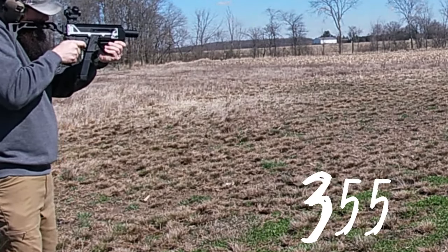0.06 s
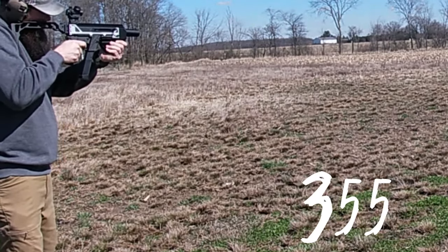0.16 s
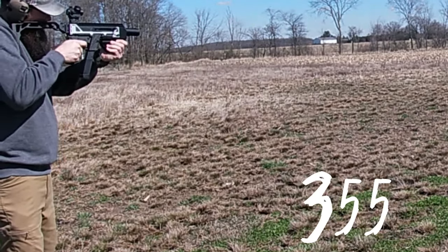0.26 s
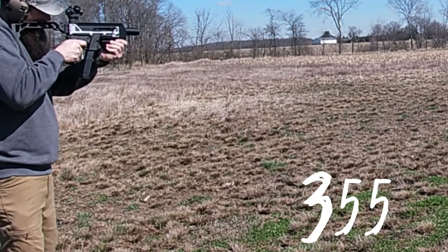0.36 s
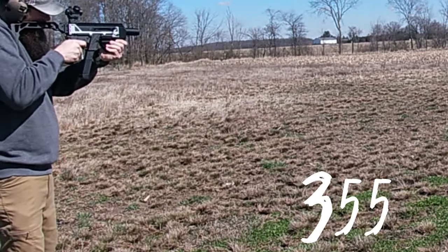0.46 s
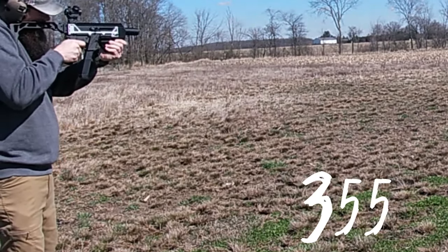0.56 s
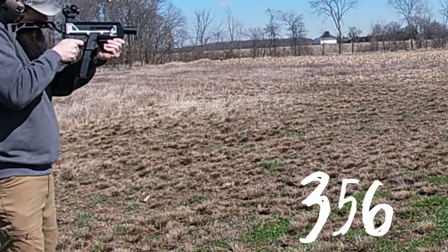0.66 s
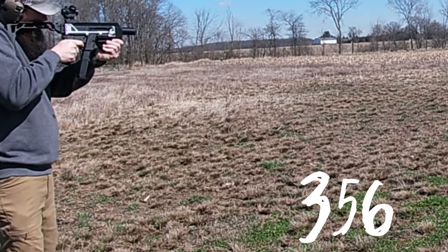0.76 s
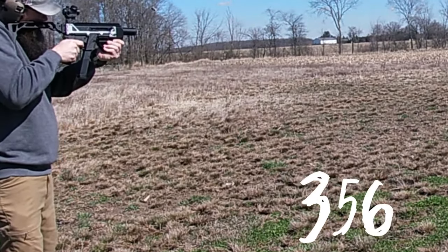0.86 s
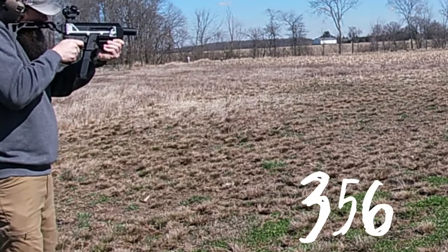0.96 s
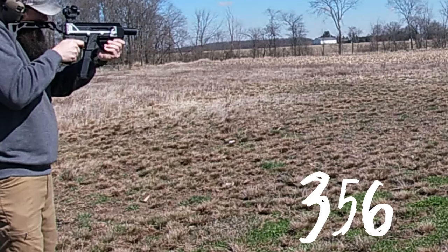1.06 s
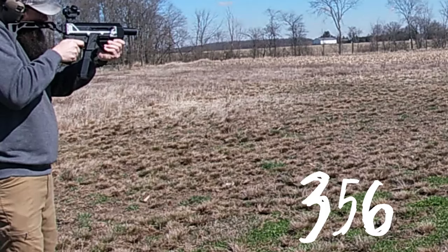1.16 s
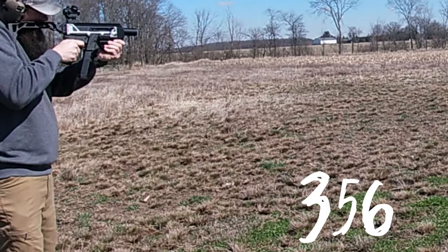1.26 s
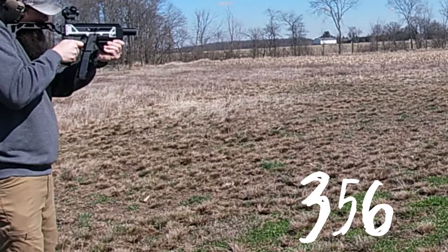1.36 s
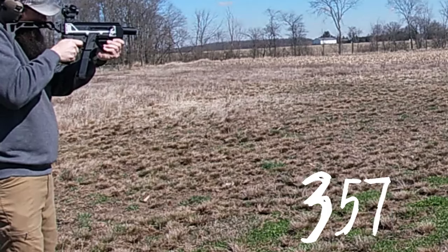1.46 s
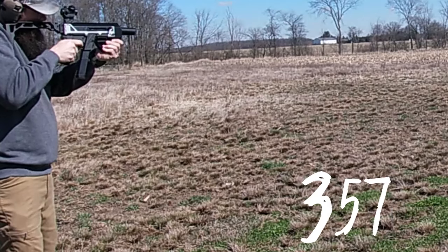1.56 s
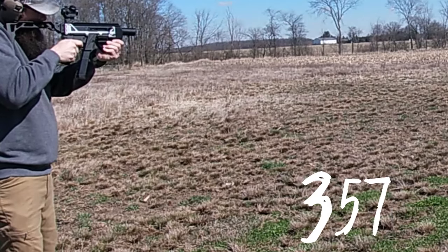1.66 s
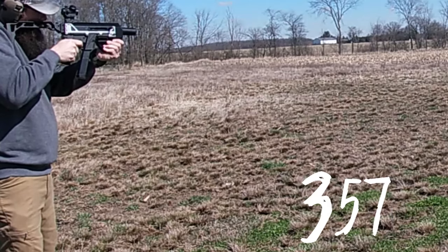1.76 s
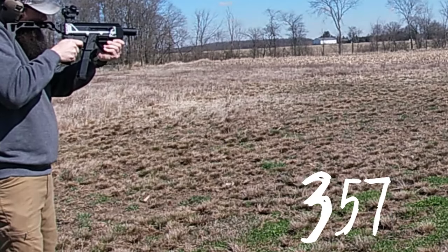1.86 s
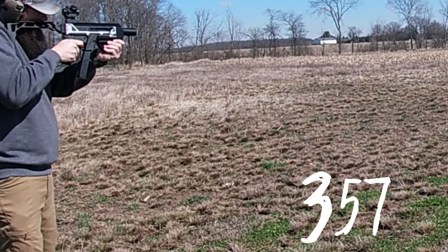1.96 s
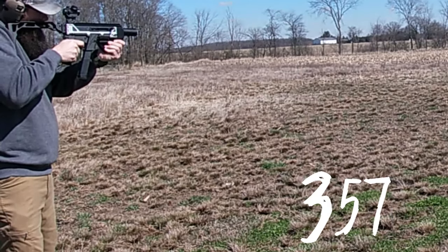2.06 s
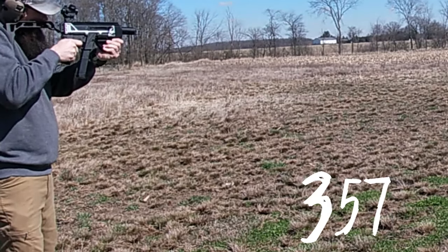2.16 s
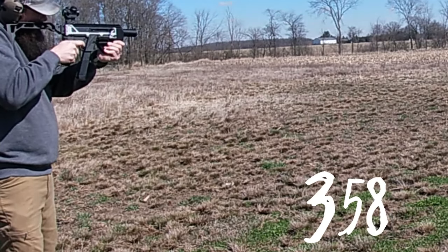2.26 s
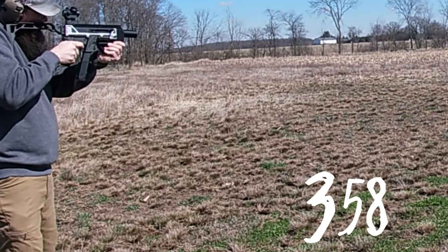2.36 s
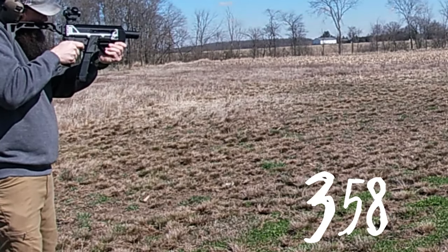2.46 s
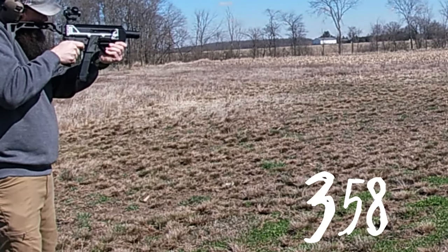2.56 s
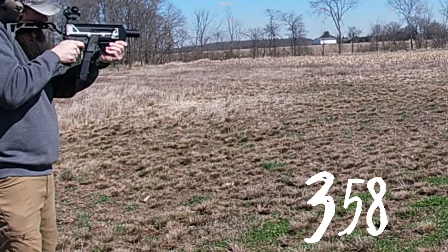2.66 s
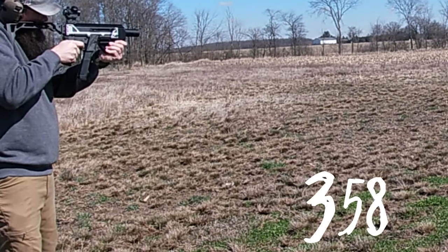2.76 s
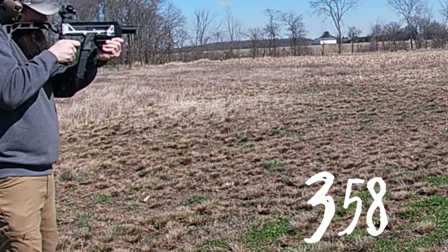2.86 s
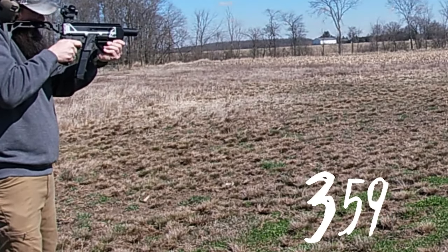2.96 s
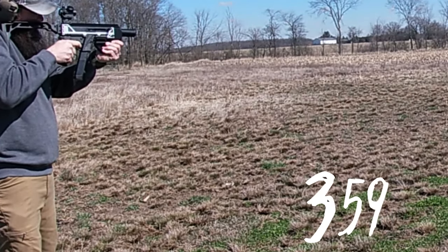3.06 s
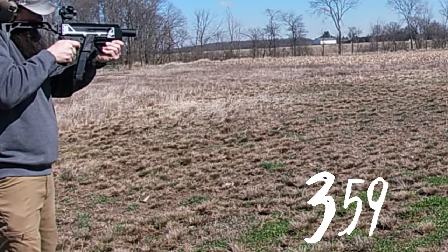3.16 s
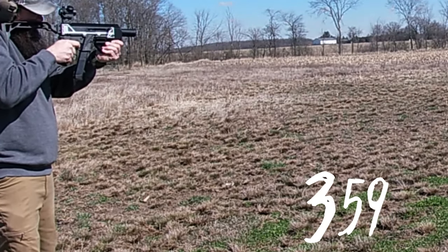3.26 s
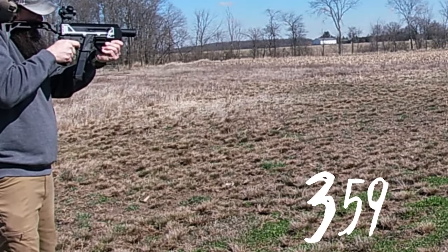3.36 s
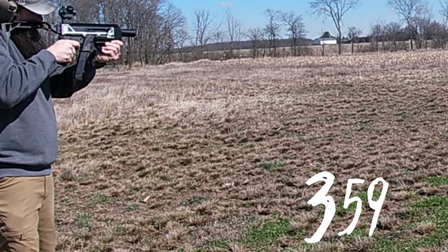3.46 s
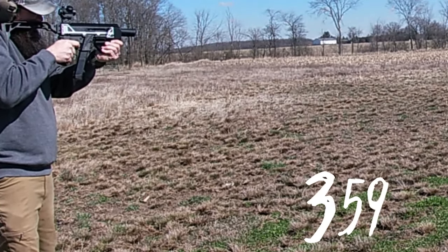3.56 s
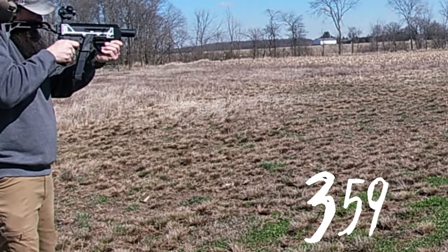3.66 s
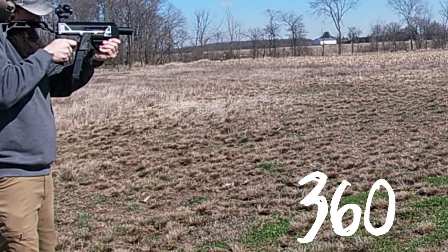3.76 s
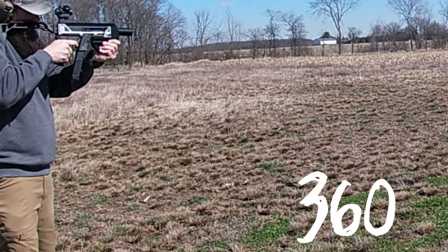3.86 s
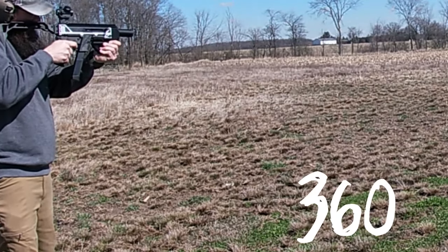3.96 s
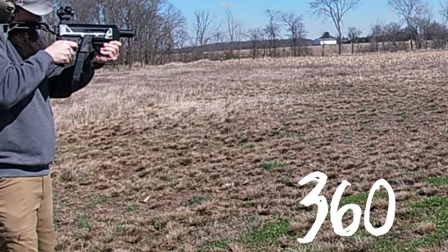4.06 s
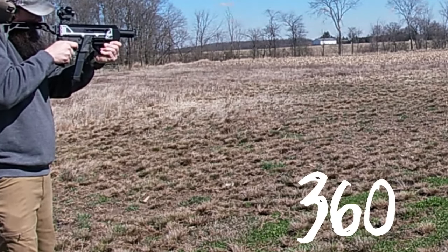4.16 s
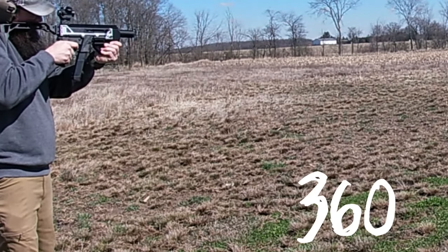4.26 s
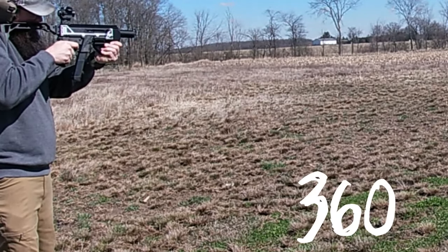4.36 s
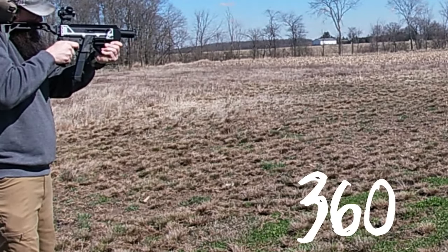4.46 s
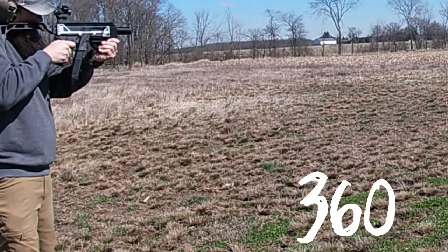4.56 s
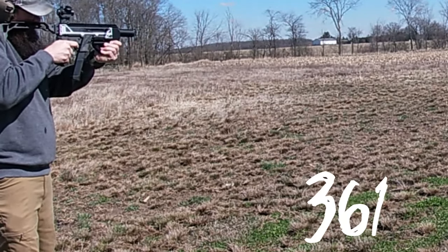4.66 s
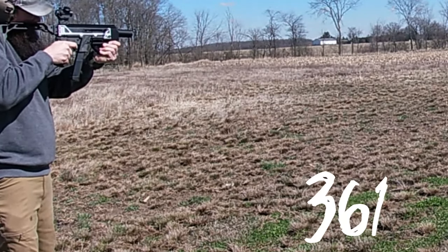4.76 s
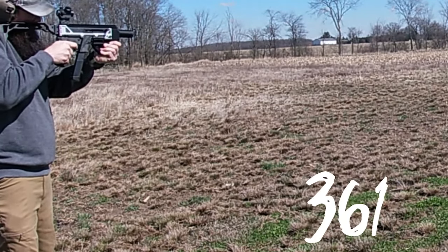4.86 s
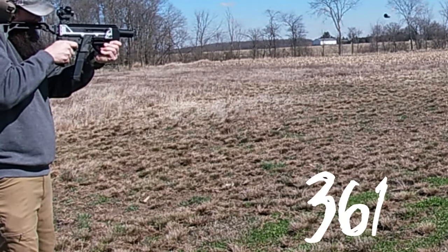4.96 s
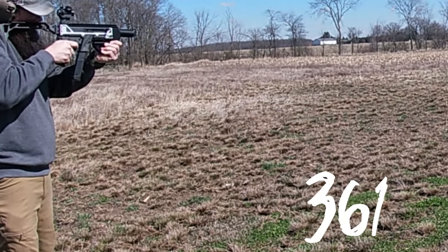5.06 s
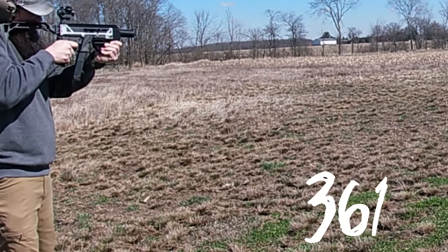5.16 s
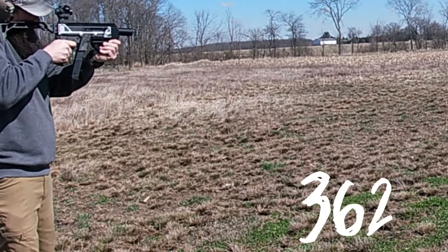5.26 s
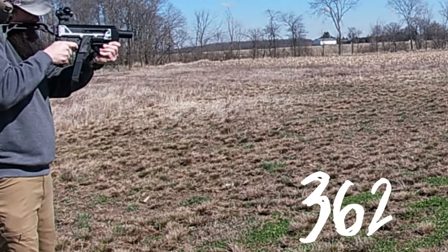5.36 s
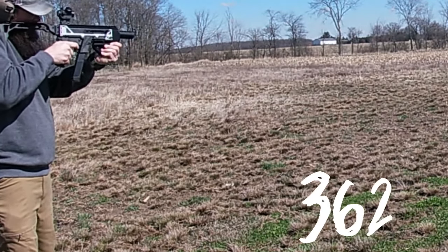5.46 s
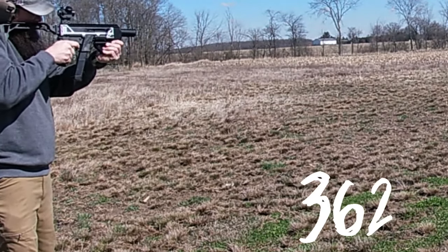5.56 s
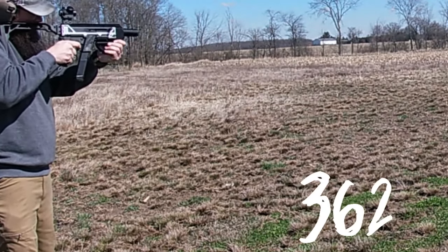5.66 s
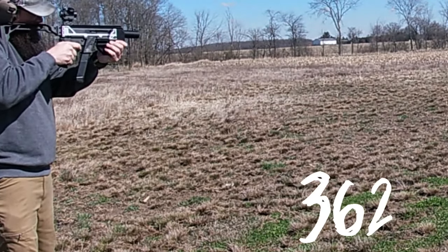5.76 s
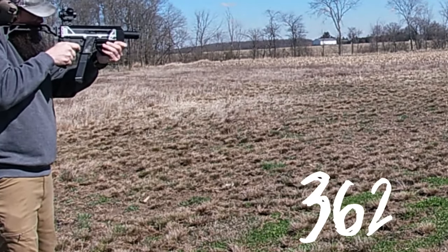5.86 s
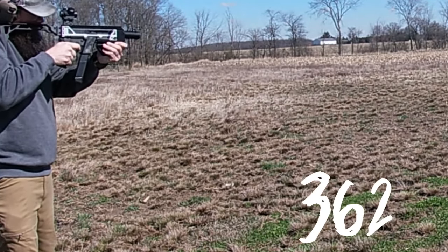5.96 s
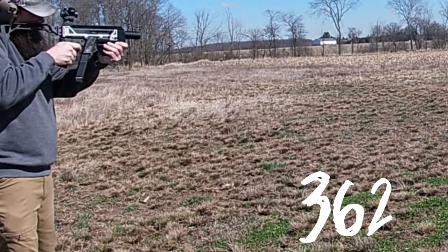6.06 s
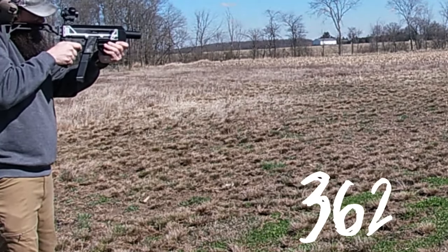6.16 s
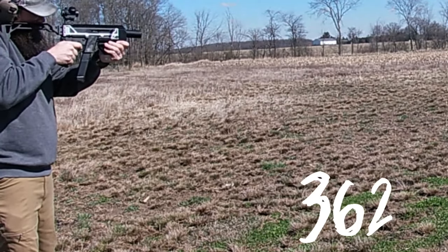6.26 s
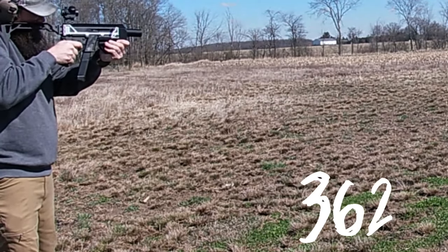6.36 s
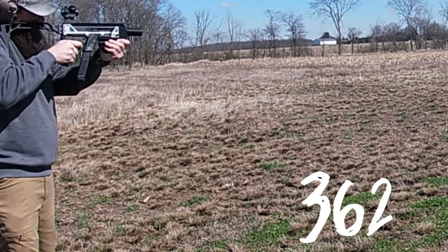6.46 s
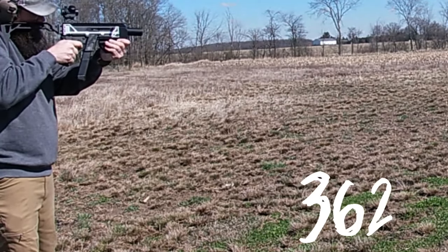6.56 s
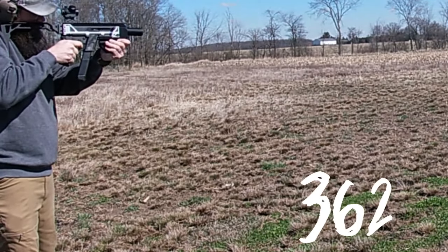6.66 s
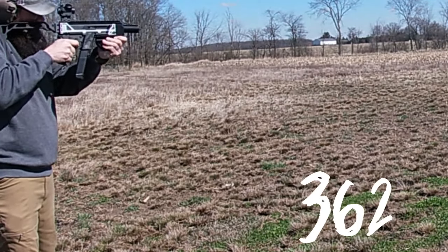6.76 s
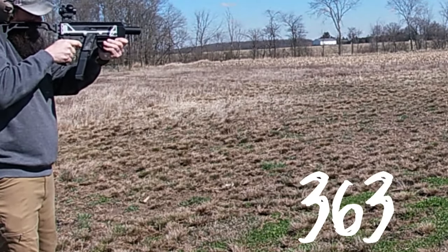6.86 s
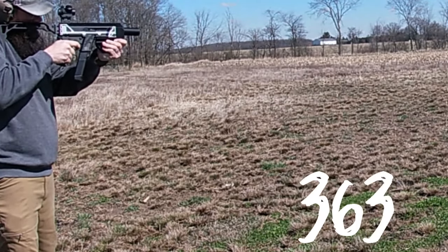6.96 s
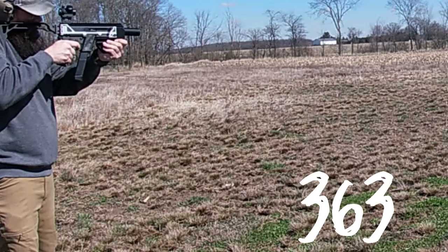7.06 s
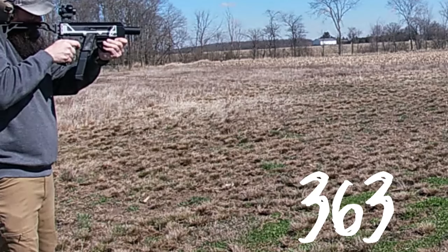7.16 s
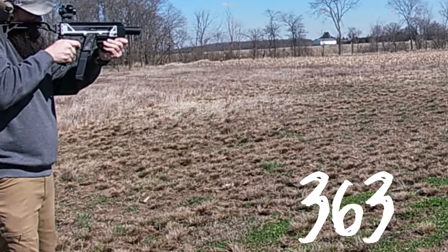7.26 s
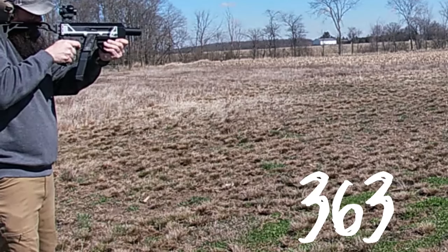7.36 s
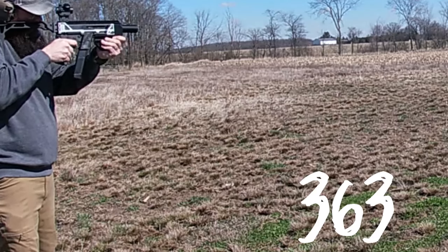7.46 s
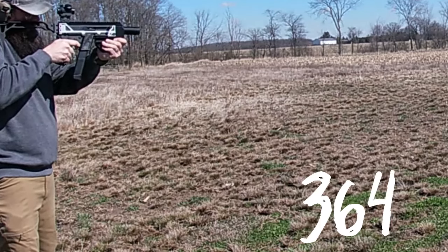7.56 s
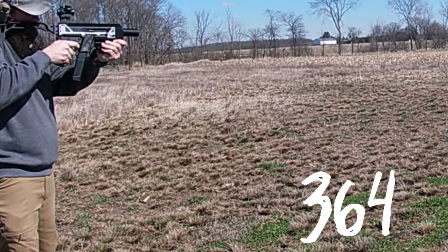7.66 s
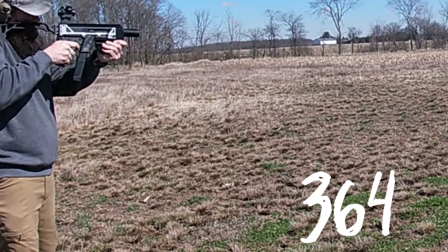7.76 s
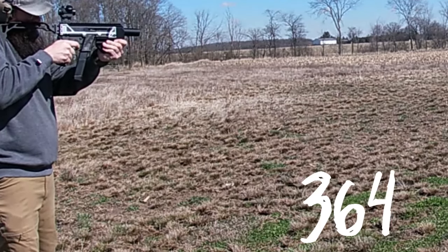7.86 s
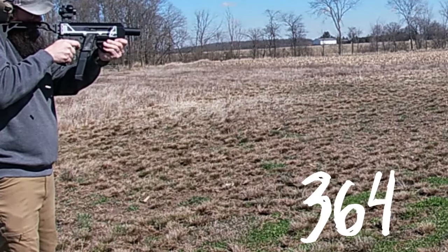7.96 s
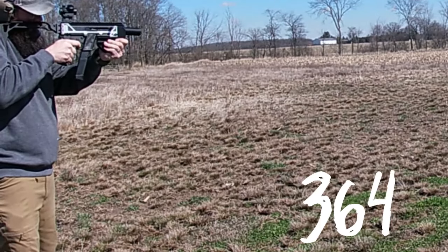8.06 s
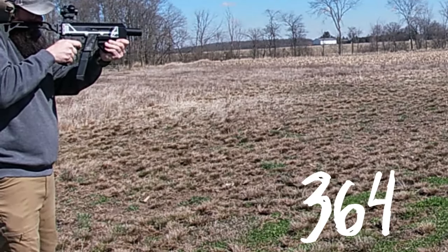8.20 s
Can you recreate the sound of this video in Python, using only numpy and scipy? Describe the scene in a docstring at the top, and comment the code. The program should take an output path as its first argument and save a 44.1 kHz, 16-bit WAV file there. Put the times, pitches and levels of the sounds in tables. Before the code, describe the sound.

Gusts of wind rumble and slap against the microphone outdoors while a nearby suppressed semi-automatic gun shoots. After an opening metallic clack come seven evenly paced, muffled shots, a short break, and a last two. Every shot ends in a quick double clack of the bolt and a short ring of steel. A few thin ticks and a faint, flickering hiss sit in the gaps.

```python
"""A silenced self-loading gun fires nine single shots, close by, in an open windy field.
Each shot is a muffled blast, the bolt knocking at the rear and slamming shut, then ringing steel.
The bolt also shuts once before the first shot; faint ticks fall between the shots.
Wind eddies thump, slap and roar on the microphone over a faint flickering hiss."""
import sys
import numpy as np
from scipy import signal
from scipy.fft import rfft, irfft, next_fast_len
from scipy.io import wavfile
from scipy.ndimage import uniform_filter1d

SR = 44100
rng = np.random.default_rng(int(sys.argv[2]) if len(sys.argv) > 2 else 0)


def wav_record(signal):
    """Record a signal, one row per channel, as 16-bit PCM in the file named by sys.argv[1]."""
    frames = np.transpose(np.atleast_2d(signal))
    bounded = np.clip(frames, -1, 1)
    # unit amplitude maps onto the largest positive 16-bit level
    quanta = np.round(bounded * 32767).astype(np.int16)
    wavfile.write(sys.argv[1], SR, quanta)


N = 362943

# Spectra. Each row: frequency in Hz, relative density in dB.
HISS_COLOUR = [(290, -32.5), (500, -7.5), (932, -14.5), (1000, -12), (1120, -13.5), (2300, -19),
               (3240, -21.5), (5530, -28), (6500, -42.5), (8450, -73.5), (14300, -120)]
TICK_COLOUR = [(1500, -33), (2600, -5.5), (3300, -5), (4300, -8), (5600, -9), (6500, -19), (10000, -42)]
WASH_COLOUR = [(410, -27.5), (700, 7.5), (1020, -0.5), (1260, -8), (1580, 1.5), (1660, -30), (1810, 2),
               (2140, -16.5), (2480, -3), (5200, -8.5), (14000, -63.5)]
KNOCK_COLOUR = [(290, -0.5), (500, -2), (1420, -6.5), (2130, -8), (2520, -3.5), (3670, -9), (4280, -11),
                (4650, -10.5), (5350, -5.5), (6590, -23), (7480, -23), (10700, -46), (14000, -53.5)]
BLAST_COLOUR = [(290, -3), (500, -9), (749, -6.5), (1240, -4.5), (1360, -6), (1500, -7.5), (1640, -9),
                (2160, -9.5), (3520, -15), (5500, -15.5), (6410, -28), (11400, -54.5), (14000, -67)]
# Hiss envelope. Each row: time in seconds, level in dB.
HISS_LEVELS = [(.2, -63), (.36, -67.5), (.45, -57), (1.101, -64), (1.4, -54), (1.8, -68.5), (2.1, -64),
               (2.701, -68.5), (3.399, -65.5), (3.701, -74), (4.3, -76), (4.549, -69), (5.05, -68),
               (5.2, -70), (5.901, -58), (6.3, -59), (6.502, -73), (7.2, -67), (7.399, -61.5), (7.9, -63.5),
               (8.1, -55)]
# Wind gusts. Each row: start and hold in seconds, rumble, buffet and roar in dB, roar's lower edge in Hz.
GUSTS = [(0.077, .1, -17.5, -30, -50, 590), (0.3, 0.036, -30, -30, -69, 416),
         (0.419, 0.03, -20, -26.5, -29, 413), (0.475, 0.03, -22, -27.5, -30.5, 520),
         (0.555, 0.015, -27.5, -29.5, -42.5, 514), (0.638, 0.072, -20.5, -24, -34.5, 315),
         (0.798, 0.099, -32, -38, -45, 320), (1.066, 0.079, -24.5, -32, -55, 227),
         (1.32, 0.053, -30, -34, -70, 233), (1.595, 0.21, -34.5, -33.5, -48.5, 143),
         (1.777, .2, -33.5, -30, -51.5, 415), (2.326, .08, -28.5, -38, -54, 234),
         (2.495, 0.097, -25, -34, -56, 233), (2.63, 0.066, -21, -29, -33, 317),
         (2.724, 0.085, -33, -32, -58.5, 493), (2.793, 0.16, -17, -26, -39, 520),
         (3.121, 0.093, -26.5, -32, -46, 334), (3.27, .1, -28.5, -34.5, -43.5, 730),
         (3.372, 0.096, -25, -29, -31, 800), (3.485, 0.053, -19, -18.5, -39, 1030),
         (3.605, 0.11, -21, -31, -51.5, 1020), (3.724, 0.099, -22, -22.5, -33, 300),
         (3.894, 0.15, -28, -31.5, -46.5, 300), (4.09, 0.16, -29, -36, -31.5, 223),
         (4.231, 0.084, -23, -27, -31.5, 517), (4.368, 0.091, -21.5, -31, -35.5, 577),
         (4.467, 0.18, -26.5, -35, -46.5, 1020), (4.77, 0.14, -22, -23, -37, 447),
         (4.93, .2, -33, -37.5, -34.5, 432), (5.15, 0.19, -28.5, -38.5, -29.5, 433),
         (5.43, 0.18, -28, -21, -34, 223), (5.552, 0.12, -24.5, -23, -37, 221.4),
         (5.743, 0.07, -32, -40.5, -37, 240), (6.072, 0.034, -33, -32.5, -53, 424),
         (6.154, 0.088, -32, -49, -36.5, 435), (6.256, 0.056, -23, -34, -38, 744),
         (6.38, 0.021, -18, -24, -46, 1040), (6.449, 0.013, -23.5, -27.5, -54.5, 1012),
         (6.51, 0.047, -21, -33, -50, 1000), (6.614, 0.05, -25, -24, -33.5, 1020),
         (6.65, 0.046, -18, -23, -31.5, 300), (6.708, 0.022, -21, -19.5, -37, 1210),
         (6.754, 0.026, -24.5, -34.5, -40, 300), (6.947, 0.032, -23.5, -31, -56, 300),
         (7.041, 0.038, -23, -23.5, -34, 300), (7.113, 0.047, -23, -20.5, -31, 300),
         (7.189, 0.038, -25, -26, -35.5, 300), (7.29, .13, -34, -43.5, -68, 300),
         (7.471, 0.052, -22, -21.5, -36, 300), (7.672, 0.12, -27.5, -34, -34.5, 236),
         (7.829, 0.061, -27, -29, -32, 340), (7.927, 0.091, -24, -26.5, -27.5, 439),
         (8.089, 0.03, -26, -29.5, -45.5, 432), (8.149, 0.062, -37, -34, -37, 494)]
# Wind slaps. Each row: start in seconds, level in dB, lower corner in Hz.
SLAPS = [(0.422, -39, 425), (0.443, -25, 468), (0.499, -33, 552), (0.642, -32, 401), (2.658, -36.5, 408),
         (2.806, -38, 570), (3.312, -49, 770), (3.366, -43, 754), (3.401, -29.5, 975), (3.458, -45, 912),
         (3.506, -39, 1080), (3.635, -35, 436), (4.251, -29, 630), (4.301, -34.5, 543), (4.457, -26, 417),
         (4.502, -37, 1130), (5.151, -27.5, 503), (6.184, -36.5, 454), (6.225, -21, 460), (6.287, -26, 790),
         (6.307, -34.5, 759), (6.396, -43.5, 444), (6.615, -45, 1110), (6.657, -22.5, 497),
         (6.704, -28.5, 681), (7.044, -32, 517), (7.147, -31.5, 565), (7.219, -33, 401),
         (7.696, -28.5, 416), (7.76, -24.5, 395), (7.942, -27, 533), (7.993, -28.5, 450)]
# Modes of receiver and bolt. Each row: frequency in Hz, level in dB, T60 in seconds.
STEEL_MODES = [(732, -26, 1.8), (1005, -22, .85), (1195, -13, .3), (1350, -16, .45), (1540, -16, .35),
               (1615, -14, .35), (1690, -14, .35), (1838, -13, .42), (2012, -14, .45), (2160, -13, .36),
               (2390, -11, .28), (2480, -10, .35), (2556, -11, .33), (2610, -11, .36), (2685, -10, .35),
               (2870, -10, .28), (2945, -11, .26), (3190, -12, .34), (3400, -12, .25), (3560, -14, .35),
               (3910, -13, .25), (4200, -14, .33), (4350, -16, .22), (4600, -18, .28), (5050, -19, .25),
               (5400, -21, .2), (5790, -21, .2)]
# Ticks, perhaps spent cases and trigger. Each row: start in seconds, level in dB, T60 in seconds.
TICKS = [(1.178, -53, .03), (1.216, -48, .03), (1.231, -37.5, 0.076), (1.7494, -44, 0.065),
         (1.8705, -49, .04), (2.0, -52, 0.034), (2.4307, -32, 0.14), (2.79, -43.5, .07), (5.5603, -58, .08),
         (7.0625, -27.5, 0.17), (7.332, -43, .03), (7.397, -40.5, .08), (7.809, -33, .09),
         (8.1088, -40, 0.085)]
# Bolt at the rear. Each row: start in seconds, level in dB, thud and push in relative dB.
BOLT_BACK = [(0.7349, -12, 3, -12), (1.5277, -16, 5.5, 2), (2.2592, -14.5, 7, -8.5), (3.0075, -16.5, 9, -8),
             (3.8466, -18.5, 11.5, 6), (4.702, -14.5, 6.5, -2.8), (5.3448, -14.5, 3, -4.5),
             (6.8855, -27.5, -14, 2.5), (7.5802, -20.5, 3, -5)]
# Bolt closing. Each row: start in seconds, level in dB, thud, push and wash in relative dB, treble lift
# in dB, ring level in dB, one emphasised ringing mode in Hz, its lift in dB, another such mode in Hz.
BOLT_SHUT = [(0.0144, -13.5, -21, 3.5, -14.5, -8, -28.5, 732, 14, 3400),
             (0.7691, -14.5, 3, 2, -22, -12.5, -27.5, 1005, 10.5, 2685),
             (1.5646, -16.5, 5, 0, -40, 1.5, -51, 1005, 15.5, 3560),
             (2.2947, -12.5, -1, -17.5, -23.5, 4, -31, 1005, 8, 1838),
             (3.0375, -14.5, -0.5, 2, -24.5, -4, -35.5, 2556, 9.5, 1005),
             (3.8796, -14.5, 2, -15.5, -23.5, -0.5, -37, 2610, 2.3, 3560),
             (4.7332, -11.5, 0.5, 2.5, -31.5, 2, -30, 1838, 10.5, 2556),
             (5.3748, -10.5, -9.5, 0, -20, -8.5, -29.5, 2556, 11, 2610),
             (6.9127, -13, -16, 6.5, -15, 6, -25.5, 2012, 5.5, 2556),
             (7.6077, -11.5, -30, -5, -14.5, -4, -28.5, 1838, 4.5, 2870)]
# Blasts. Each row: start in seconds, level in dB, thud and push in relative dB, treble lift in dB,
# swell lead in seconds, swell level in dB, swell peak in Hz.
BLASTS = [(0.6876, -10, -0.5, 0, -10, 0.035, -15, 3800), (1.4816, -11, 0.5, 1.5, 10, 0.034, -14.5, 1800),
          (2.213, -11.5, -2.5, 8.5, 8, 0.034, -19.5, 3200), (2.958, -14, 5, -9, 0, 0.026, -17.5, 830),
          (3.7958, -14, 7, -21, -1.5, 0.036, -23, 2400), (4.6504, -11.5, 1.8, 4, -3.7, 0.032, -20.5, 950),
          (5.2933, -12, 3.5, 3.5, 0, 0.041, -21.5, 3200), (6.8381, -10, -6.5, -5.5, -7, 0.042, -10, 3100),
          (7.5339, -10.5, -6, -19, 2.5, 0.037, -15.5, 3600)]

RUSTLES_PER_S, RUSTLE_DECAY_S, RUSTLE_SIZE = 27, 0.006, 0.57
GUST_RISE_DB_PER_S = 898.5
GUST_FALL_DB_PER_S, LULL_DB = (249.5, 351.5, 550.5), (-39, -47.5, -64)  # rumble, buffet, roar
SLAP_T60_S, WASH_T60_S = 0.045, 0.39
TICK_RING_DB, OTHER_MODE_LIFT_DB = -14.5, 6
BAND_LIMIT_HZ = 14200


def gain_of(db):
    """Decibels to amplitude."""
    return 10 ** (np.asarray(db) / 20)


def unit_rms(x):
    """Scales to rms 1."""
    return x / np.sqrt(np.mean(x ** 2) + 1e-20)


def onset(t, tau_s):
    """Exponential rise from 0 to 1."""
    return 1 - np.exp(-t / tau_s)


def add(mix, start_s, sound):
    """Adds a sound to the mix in place."""
    part = mix[max(round(start_s * SR), 0):][:len(sound)]
    part += sound[:len(part)]


def noise(colour, size, patchy_db=0.):
    """Noise of rms 1 shaped by (Hz, dB) points and random bumps; silent above the last point."""
    points_hz, points_db = np.transpose(colour)
    hz = np.fft.rfftfreq(size, 1 / SR)
    bumps = np.interp(hz, np.arange(80) * 220., rng.uniform(-np.sqrt(3), np.sqrt(3), 80))
    smooth_db = np.interp(np.log(hz + 1), np.log(points_hz), points_db)
    shape = gain_of(smooth_db + patchy_db * bumps) * (hz < points_hz[-1])
    return unit_rms(irfft(rfft(rng.standard_normal(size)) * shape, size))


def flutter(rate_hz, size):
    """Slow random modulation of rms 1."""
    return noise([(1, 0), (rate_hz, 0), (rate_hz * 2, -30)], size)


def treble_shelf(colour, lift_db):
    """Lifts a colour's points above 5 kHz, fully from 10 kHz."""
    hz, db = np.transpose(colour)
    return np.transpose([hz, db + lift_db * np.clip(np.log2(hz / 5000), 0, 1)])


def field_hiss():
    """Faint flickering hiss that comes and goes, with small rustles."""
    size = next_fast_len(N)
    level_db = np.interp(np.arange(N) / SR, *np.transpose(HISS_LEVELS)) + 3.5 * flutter(7, size)[:N]
    hiss = noise(HISS_COLOUR, size, patchy_db=-2.5) * gain_of(1.4 * flutter(28, size))
    impulses = (rng.random(N) < RUSTLES_PER_S / SR) * rng.exponential(1, N) * RUSTLE_SIZE
    rustles = signal.lfilter([1], [1, -np.exp(-1 / (RUSTLE_DECAY_S * SR))], impulses)
    rustles = uniform_filter1d(uniform_filter1d(rustles, size=100), size=100)  # soft starts
    return (gain_of(level_db) * (0.67 + rustles) + gain_of(-77)) * hiss[:N]


def gusts(t):
    """Gusts rise fast, hold and die away; the loudest rules. Returns three levels and the roar's edge."""
    start_s, hold_s, *layers_db, edge_hz = np.transpose(GUSTS)[:, :, None]
    early_db = GUST_RISE_DB_PER_S * np.maximum(start_s - t, 0)
    late_s = np.maximum(t - start_s - hold_s, 0)
    each_db = [db - early_db - fall * late_s for db, fall in zip(layers_db, GUST_FALL_DB_PER_S)]
    levels_db = [np.maximum(db.max(0), lull_db) for db, lull_db in zip(each_db, LULL_DB)]
    return levels_db, edge_hz[each_db[2].argmax(0), 0]


def wind_roar(size):
    """Bursts of small eddies: a roar with a sharp lower edge that steps up and down in pitch."""
    crackle = rng.standard_normal(N) * gain_of(3.2 * flutter(230, size)[:N])
    hz, frames_s, spectra = signal.stft(unit_rms(crackle), SR, nperseg=1024, noverlap=768)
    _, edge_hz = gusts(frames_s)
    fall_db_per_octave = 18 + np.log2(edge_hz / 400)
    octaves = np.log2((hz[:, None] + 1) / edge_hz)
    shape = gain_of(-fall_db_per_octave * np.maximum(octaves, 0) + np.clip(160 * octaves, -24, 0))
    shape *= gain_of(1.7 * np.exp(-(octaves / 0.2) ** 2))  # hollow peak at the edge
    shape /= np.sqrt(np.sum(shape[8:38] ** 2, 0) / 512)  # rms 1 from 350 to 1600 Hz
    return signal.istft(spectra * shape, SR, nperseg=1024, noverlap=768)[1][:N]


def wind():
    """Eddies on the microphone: rumble and buffet thump in lumps under the roar."""
    grid_s = np.arange(0, N, 64) / SR
    levels_db, _ = gusts(grid_s)
    rumble_db, buffet_db, roar_db = (np.interp(np.arange(N) / SR, grid_s, db) for db in levels_db)
    size = next_fast_len(N)
    rumble = noise([(10, -15.5), (22, 9), (45, 16), (90, 8.5), (130, 0), (250, -54.5)], size)
    buffet = noise([(70, -22.5), (115, 4.5), (200, -4.5), (330, -18), (500, -22.5), (1200, -50.5)], size)
    lumps, flaps = flutter(11, size), flutter(33, size)
    rumble = unit_rms(rumble * gain_of(5.1 * lumps))[:N]
    buffet = unit_rms(buffet * gain_of(2.8 * lumps + 2.8 * flaps))[:N]
    roar = wind_roar(size) * gain_of(2.76 * flaps[:N] + 1.2 * flutter(60, size)[:N])
    mix = gain_of(rumble_db) * rumble + gain_of(buffet_db) * buffet + gain_of(roar_db) * roar
    return signal.sosfilt(signal.butter(10, 5900, fs=SR, output="sos"), mix)


def wind_slaps():
    """Wind slaps the microphone: short dull bursts with soft starts."""
    out, t = np.zeros(N), np.arange(4096) / SR
    for start_s, db, hz in SLAPS:
        colour = [(hz / 2, -25), (hz, -3), (2.1 * hz, 0), (3.1 * hz, -14), (5900, -40)]
        envelope = gain_of(db - 60 * t / SLAP_T60_S) * onset(t, 0.0025)
        add(out, start_s, noise(colour, len(t)) * envelope)
    return out


def tick(db, t60_s):
    """A thin tick that leaves the upper steel modes ringing briefly."""
    t = np.arange(8192) / SR
    hz, mode_db, mode_t60_s = np.transpose([mode for mode in STEEL_MODES if mode[0] > 2300])[:, :, None]
    spread, phase = rng.standard_normal((2, len(hz), 1))
    envelopes = gain_of(TICK_RING_DB + mode_db + 4 * spread - 60 * t / mode_t60_s)
    modes = envelopes * np.sin(2 * np.pi * (hz * t + phase))
    click = noise(TICK_COLOUR, len(t), patchy_db=9) * gain_of(-11.5 - 60 * t / t60_s)
    return gain_of(db) * (click + modes.sum(0)) * onset(t, 0.00087)


def steel_ring(db, one_hz, lift_db, other_hz):
    """Receiver and bolt ring with slow beats; where a slam lands emphasises a mode or two."""
    t = np.arange(24576) / SR
    hz, mode_db, t60_s = np.transpose(STEEL_MODES)[:, :, None]
    spread, detune, phase, beat_rate, beat_phase = rng.standard_normal((5, len(hz), 1))
    is_one, is_other = (abs(hz - f) == abs(hz - f).min() for f in (one_hz, other_hz))
    start_db = db + mode_db + lift_db * is_one + OTHER_MODE_LIFT_DB * is_other + 2.5 * spread
    beats = 1 + 0.24 * np.sin(2 * np.pi * (0.0024 * hz * beat_rate * t + beat_phase))
    tones = np.sin(2 * np.pi * (hz * (1 + 0.0022 * detune) * t + phase))
    modes = gain_of(start_db - 60 * t / t60_s) * beats * tones
    return modes.sum(0) * onset(t, 0.0025)


def blow(db, thud_db, push_db, colour, t60_s, wash_db, push_hz):
    """A rattling crack, a thud, a low push of air and a longer wash back from gun and ground."""
    t = np.arange(16384) / SR
    rattle = gain_of(3.2 * np.tanh(flutter(92, len(t))))
    crack_envelope = gain_of(-60 * (t / t60_s) ** 1.142) * rattle + 0.9 * np.exp(-t / 0.00079)
    crack = noise(colour, len(t), patchy_db=2) * crack_envelope
    thud_colour = [(60, -16), (130, 2), (250, -4.5), (500, -5.5), (1000, -19.5), (1600, -36.5),
                   (2500, -63)]
    thud = noise(thud_colour, len(t)) * gain_of(thud_db - 60 * t / (1.01 * t60_s))
    push = gain_of(push_db) * np.cos(2 * np.pi * push_hz * t) * np.exp(-t / 0.015)
    wash_envelope = gain_of(wash_db - 60 * t / WASH_T60_S) * rattle ** 0.5
    wash = noise(WASH_COLOUR, len(t), patchy_db=5.5) * wash_envelope
    return gain_of(db) * onset(t, 0.0012) * (crack + (thud + push) * onset(t, 0.002) + wash)


def swell(lead_s, db, hz):
    """Dull patchy noise that grows into the blast."""
    progress = np.arange(4096) / SR / lead_s
    colour = [(200, -8), (hz / 2, -3), (hz, 0), (3900, -9), (5300, -2), (6100, -8), (6500, -45)]
    envelope = np.where(progress < 1, progress ** 2, np.exp(-(progress - 1) * 8))
    return gain_of(db) * noise(colour, len(progress), patchy_db=9.5) * envelope


def gun():
    """Muffled blast; the bolt knocks at the rear, feeds, slams shut and bounces; steel rings, ticks."""
    out = np.zeros(N)
    for start_s, db, thud_db, push_db, lift_db, lead_s, swell_db, swell_hz in BLASTS:
        colour = treble_shelf(BLAST_COLOUR, lift_db)
        add(out, start_s - lead_s, swell(lead_s, swell_db, swell_hz))
        add(out, start_s, blow(db, thud_db, push_db, colour, t60_s=0.15, wash_db=-14, push_hz=55))
    for start_s, db, thud_db, push_db in BOLT_BACK:
        knock = blow(db, thud_db, push_db, BLAST_COLOUR, t60_s=0.055, wash_db=-18.5, push_hz=289)
        add(out, start_s, knock)
    for start_s, db, thud_db, push_db, wash_db, lift_db, *ringing in BOLT_SHUT:
        colour = treble_shelf(KNOCK_COLOUR, lift_db)
        feed = blow(db - 11, thud_db + 5, 2, colour, t60_s=0.13, wash_db=-39.5, push_hz=300)
        slam = blow(db, thud_db, push_db, colour, t60_s=0.065, wash_db=wash_db, push_hz=72)
        bounce = blow(db - 14.5, thud_db - 3, 5.9, colour, t60_s=0.13, wash_db=wash_db, push_hz=70.5)
        add(out, start_s - 0.008, feed)
        add(out, start_s, slam)
        add(out, start_s + 0.012, bounce)
        add(out, start_s, steel_ring(*ringing))
    for start_s, db, t60_s in TICKS:
        add(out, start_s, tick(db, t60_s))
    return out


def scene():
    """Gun, wind and field, mono."""
    return (gun() + wind() + wind_slaps() + field_hiss())[None]


def record(dry):
    """Soft overload on the peaks, then the band limit."""
    clipped = 0.95 * np.tanh(dry / 0.95)
    lowpass = signal.firwin(511, BAND_LIMIT_HZ, window=("kaiser", 9), fs=SR)
    return signal.oaconvolve(clipped, lowpass[None], "same")


dry = scene()
out = record(dry)
wav_record(out)
```